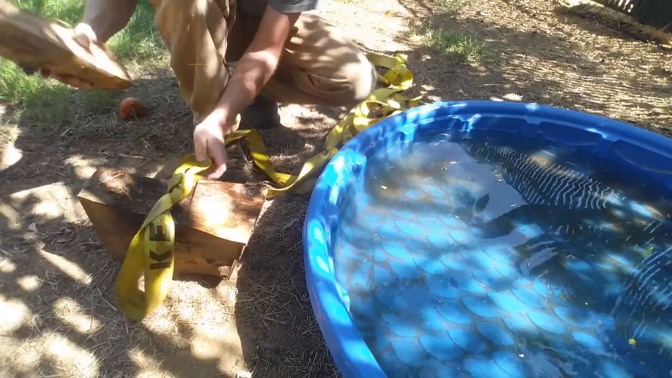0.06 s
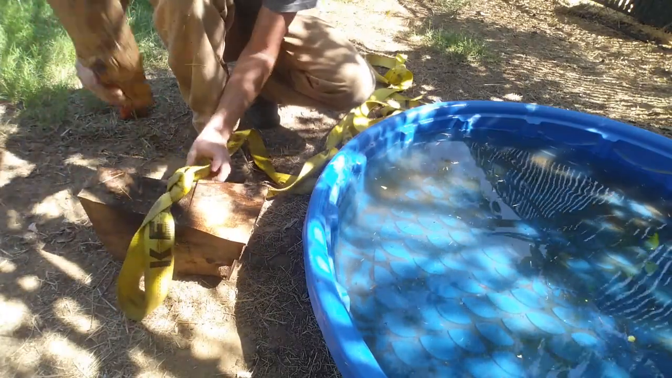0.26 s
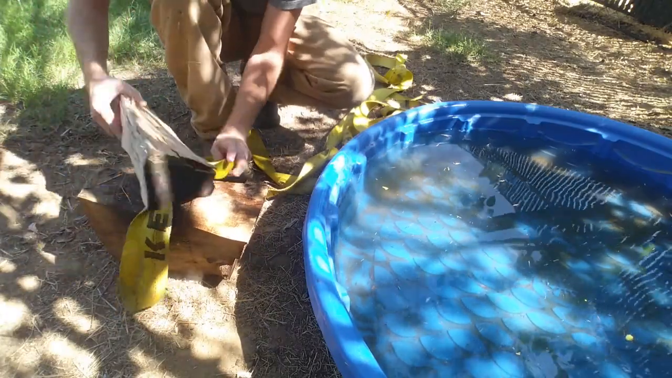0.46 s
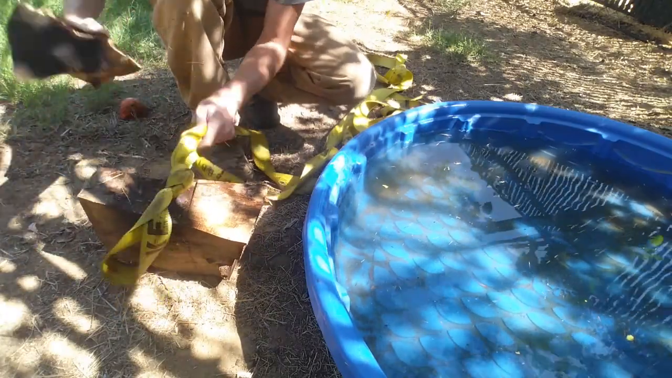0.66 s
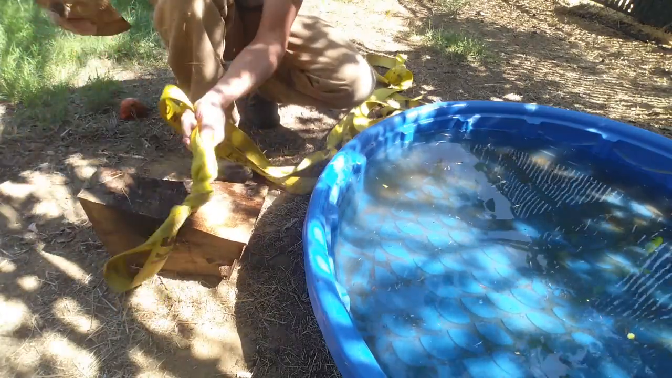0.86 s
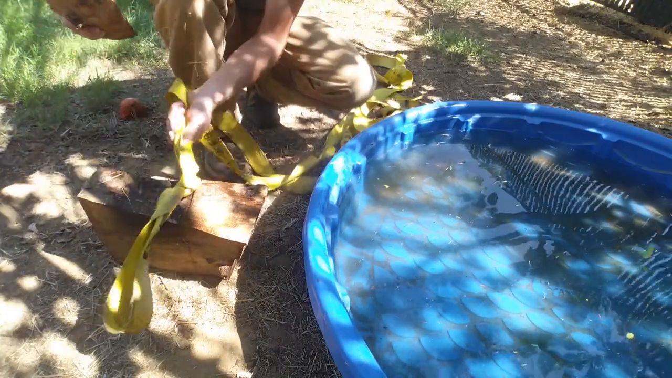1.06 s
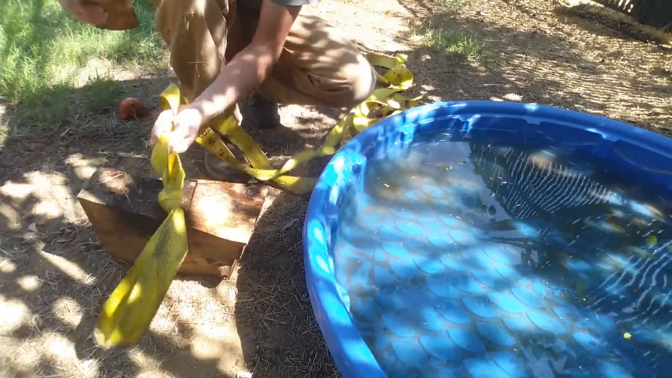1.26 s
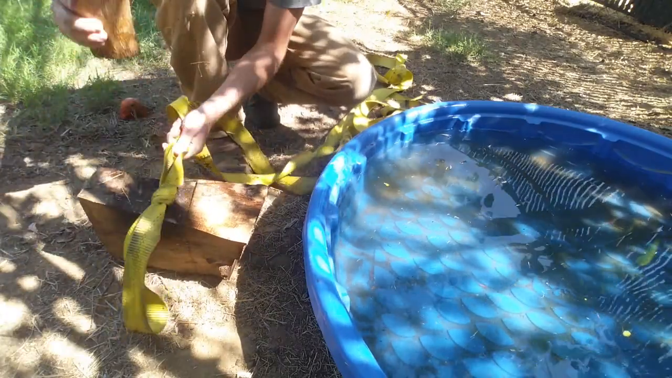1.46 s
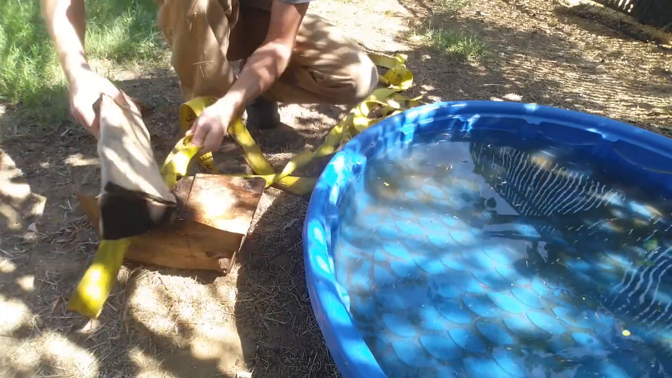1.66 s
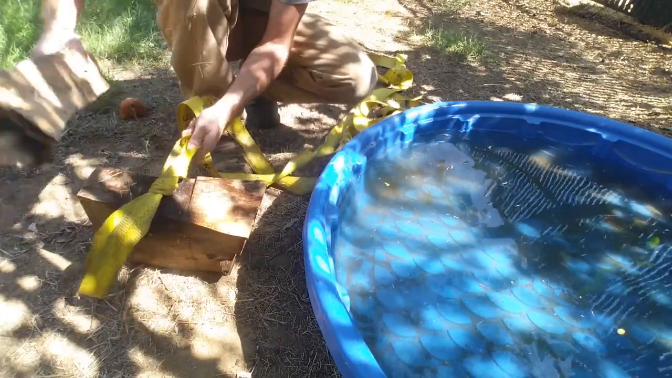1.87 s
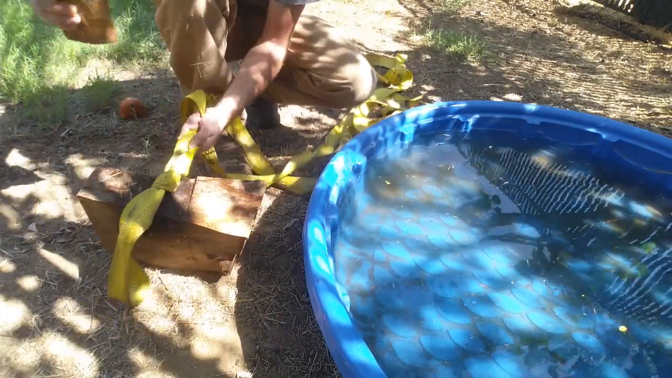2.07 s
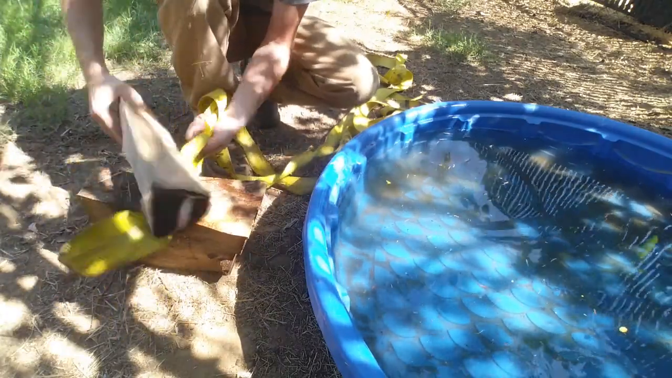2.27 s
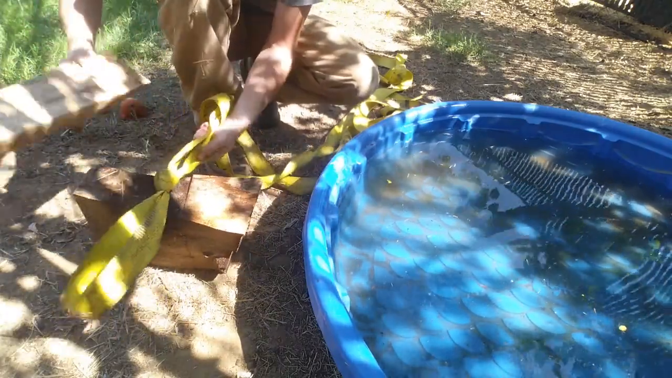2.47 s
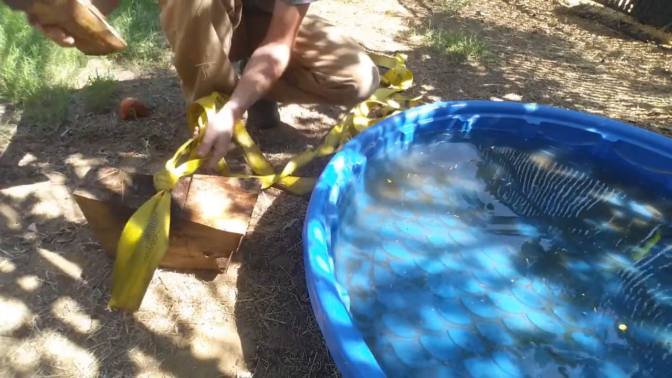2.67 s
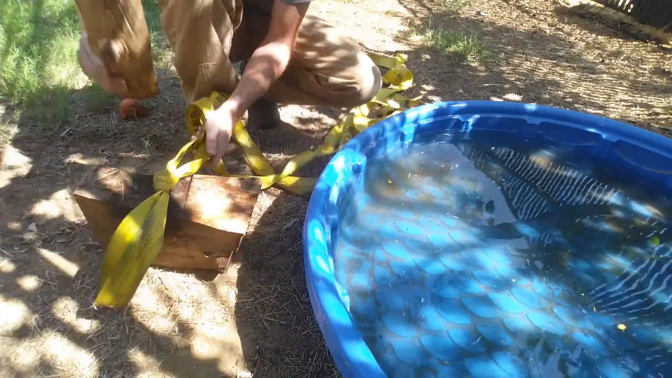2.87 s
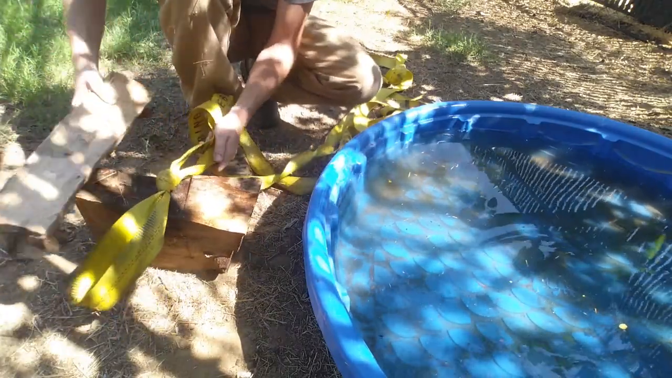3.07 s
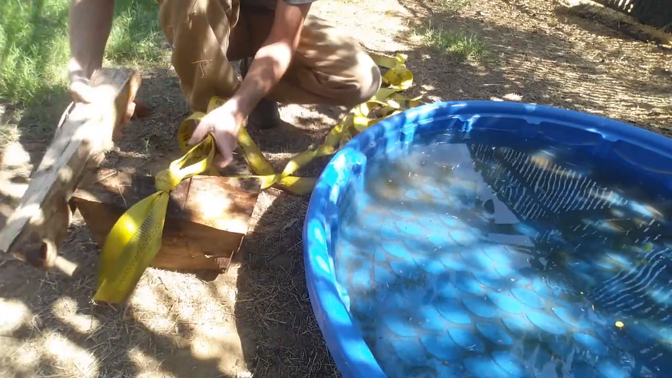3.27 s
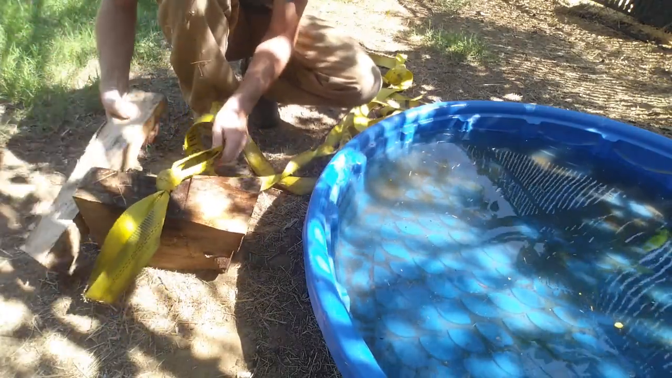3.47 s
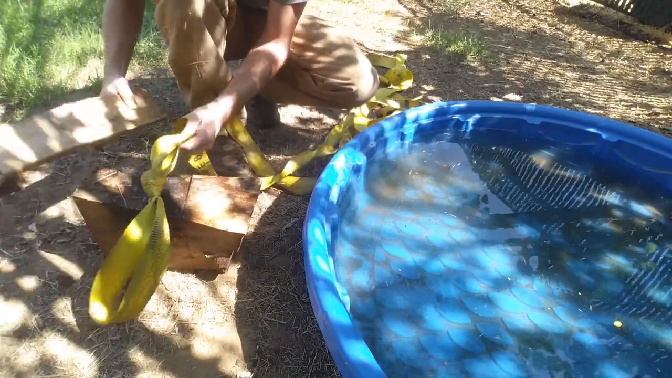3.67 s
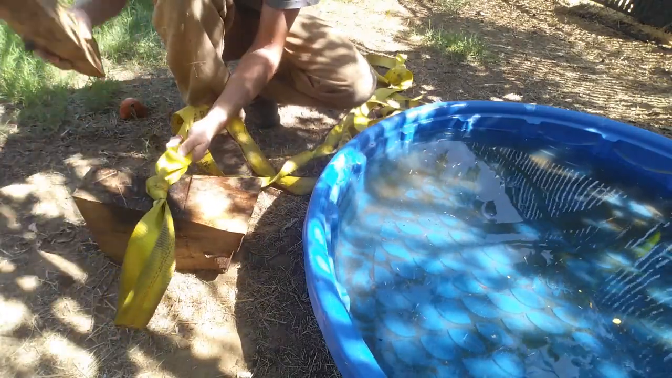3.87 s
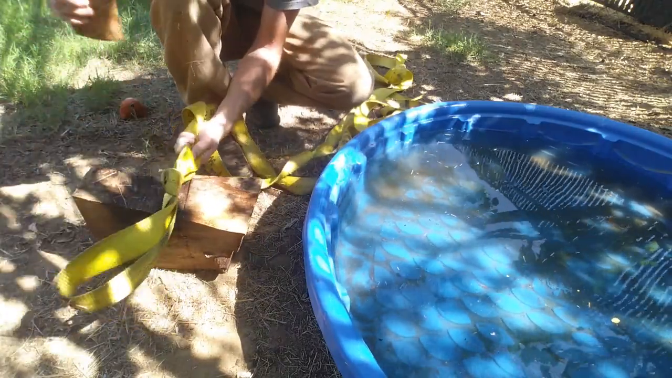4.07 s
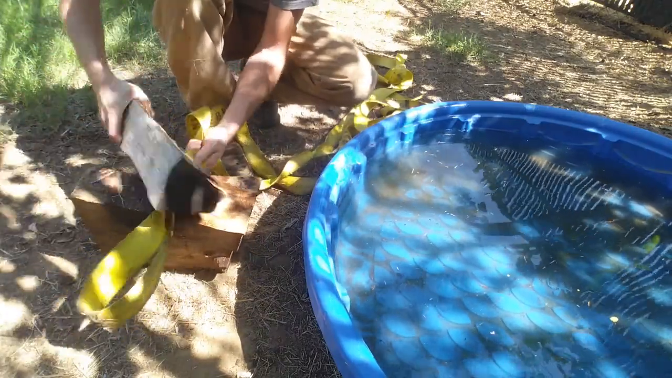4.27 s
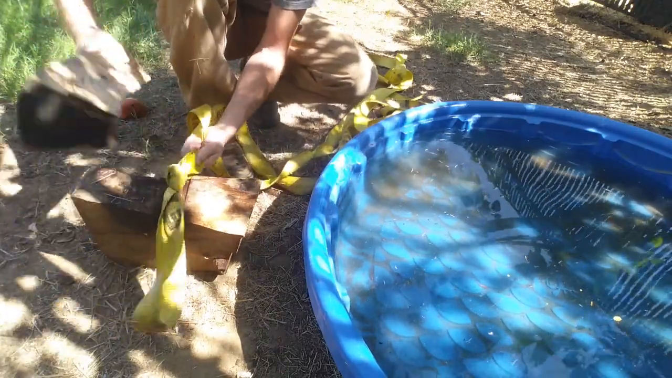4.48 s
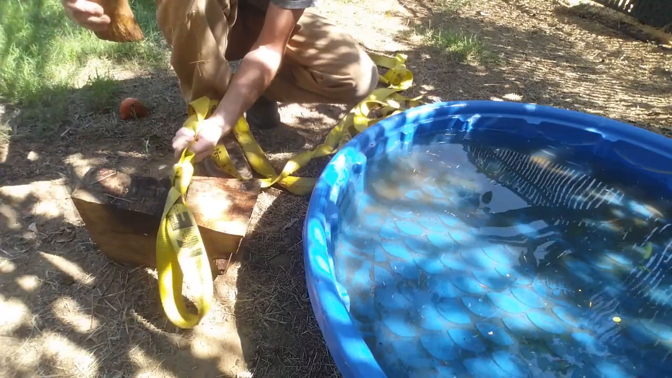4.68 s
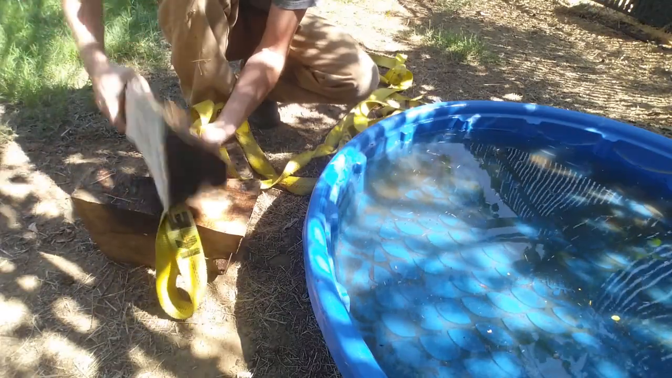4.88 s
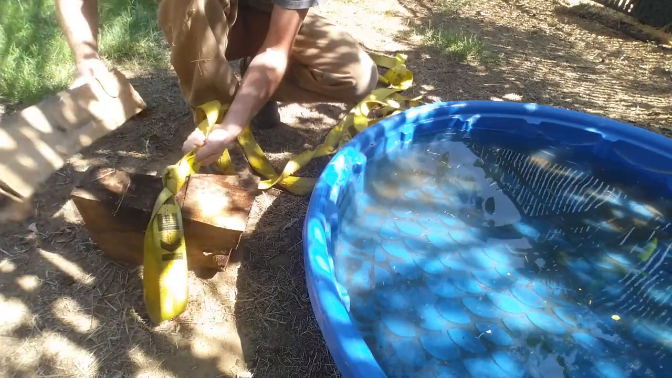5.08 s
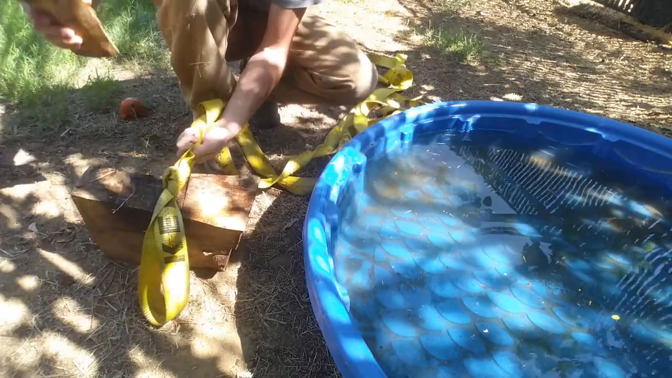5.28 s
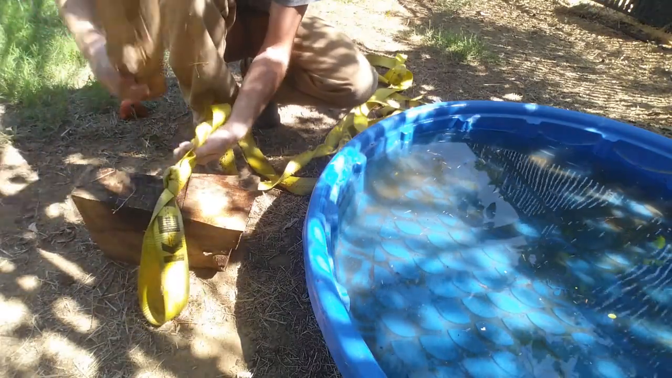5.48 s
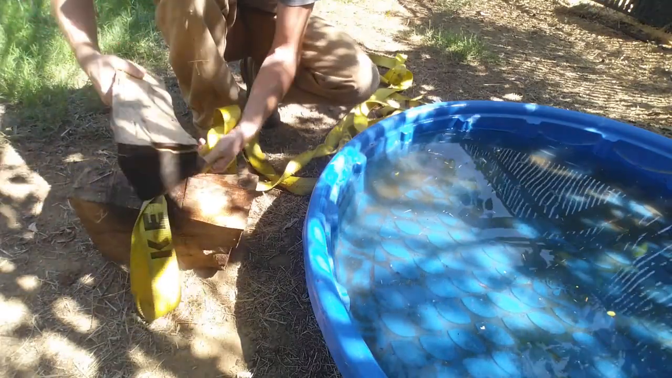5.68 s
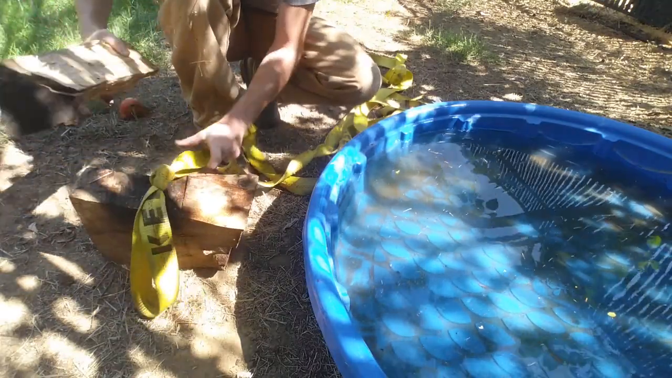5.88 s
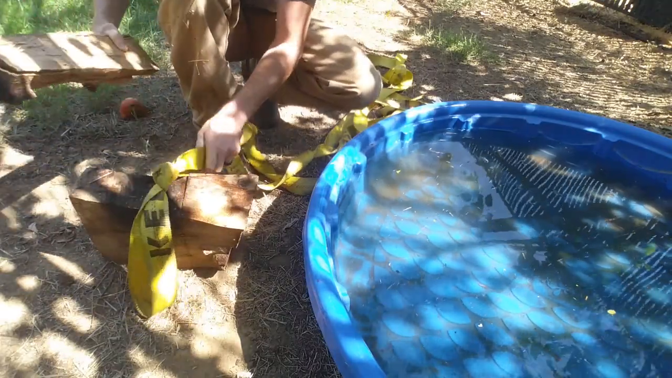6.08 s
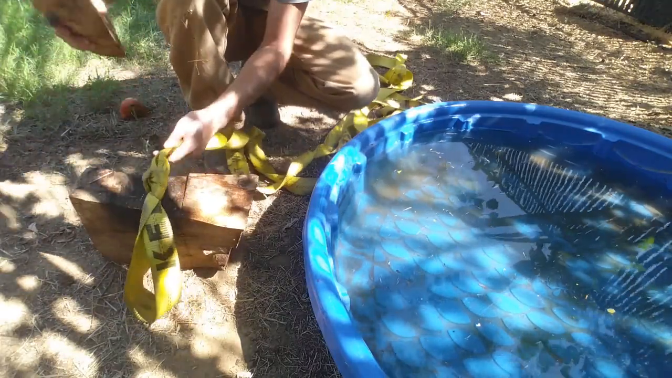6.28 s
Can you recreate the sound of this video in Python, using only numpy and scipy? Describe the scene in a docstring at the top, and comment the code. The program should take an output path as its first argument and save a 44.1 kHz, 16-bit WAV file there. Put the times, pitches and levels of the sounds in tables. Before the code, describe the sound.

An open yard with soft low traffic rumble, leaf noise, slight hiss and a wavering hum that partly fades. At 0.45 s a log hits a wet knotted strap on a wooden block: hard clack, short woody thud, small wet splat and a quick hollow ring, stronger on the right. Faint rustles and knot taps follow around 0.9-1.3 s. More blows land at 1.7, 2.4, 3.0, 4.4, 5.0 and 5.65 s; the one at 2.4 s is the splashiest, a bright spray, and 3.0 s has the hardest clack. Tiny soft touches precede most, with dull rebounds about 0.1 s after several. A wet slap at 3.1 s and ticks of the knot at 3.2-3.55 s follow. From about 3.5 s a vehicle swells, its engine pitch climbing from 4.1 to 5.55 s, then sagging and fading by 6 s. Echoes are short and sparse; the background ducks briefly after the sharpest hits.

```python
"""A yard: firewood pounds a wet knotted strap on a wooden block, seven blows with soft touches and rebounds.
Ringing modes clack and thud, shaped noise splats, and a delayed hollow ring answers, stronger on the right.
Noise bursts make the strap rustle and tick between blows; sparse echoes place them in the yard.
A low hum of wavering sines partly fades, a vehicle of swept engine orders and tyre noise speeds up and eases
off, and far traffic and leaves are patchy noise. A gain control ducks after the sharpest sounds."""
import sys
import numpy as np
from scipy import signal
from scipy.fft import rfft, irfft
from scipy.io import wavfile
from scipy.ndimage import uniform_filter1d

SR = 44100
rng = np.random.default_rng(int(sys.argv[2]) if len(sys.argv) > 2 else 0)


def master_out(mix):
    """Clip the mix to full scale and print it as 16-bit PCM to the path in sys.argv[1]."""
    frames = np.transpose(np.atleast_2d(mix))
    ceiling = np.clip(frames, -1, 1)
    pcm = np.round(ceiling * 32767).astype(np.int16)
    wavfile.write(sys.argv[1], SR, pcm)


def level_to_linear(level):
    """Convert decibel levels to linear amplitude factors, elementwise."""
    exponent = np.asarray(level, float) / 20
    return 10 ** exponent


N = 278712

# ringing modes of the wooden block: pitch_hz, level_db, t60_s
BLOCK_MODES = [(239, -0.5, 0.097), (304, 1, 0.02), (370.8, -3.5, 0.062), (468, -0.5, 0.035),
               (505, 0, 0.061), (640, -8, .03), (812, 0, .045), (940, -17, .03), (1100, -9, 0.041)]


def evened(x):
    """Scales to rms 1."""
    return x / np.sqrt(np.mean(x ** 2) + 1e-20)


def read(points, hz):
    """Reads a spectrum table on a log-frequency axis."""
    f, value = np.transpose(points)
    return np.interp(np.log(hz + 1), np.log(f + 1), value)


def add(mix, start_s, sound):
    """Mixes a sound in at start_s."""
    part = mix[..., round(start_s * SR):][..., :sound.shape[-1]]
    part += sound[..., :part.shape[-1]]


def ring(modes, detune=1):
    """Dying sines, one per mode; detune scales their pitches, as striking another spot would."""
    hz, db, t60 = np.transpose(modes)[..., None]
    t = np.arange(SR // 3) / SR
    waves = np.sin(2 * np.pi * (hz.T * detune).T * t)
    return (level_to_linear(db - 60 * t / t60) * waves).sum(0)


def contacts():
    """Every contact, slap included: start_s, clack_db, thud_db, splat_db, sharpness steps, squeeze_ms."""
    # full blows, wood driven onto wood: start_s, clack_db, thud_db, splat_db, squeeze_ms
    full_blows = [(0.457, -3.5, -10.5, -19.5, 3.84), (1.7262, -8, -10, -16.5, 4.3),
                  (2.3830, -5, -3, -2, 1.95), (3.0422, 2, -5, -14, 4.96), (4.368, -3, -4, -18.5, 6.2),
                  (4.9997, -10.5, -5.5, -16.5, 1.83), (5.6448, -3.5, -7, -15, 1.54)]
    # the log meets the soft knot just before most blows: start_s, clack_db, splat_db, squeeze_ms
    touches = [(.4519, -13.5, -37, 4.4), (1.7238, -21, -20.5, 3.1), (2.3752, -20.5, -24, 7.2),
               (4.3660, -12, -43, 4.7), (4.9935, -20, -29, 12.7), (5.6400, -14, -27, 6.1)]
    # the block lands again; at 3.12 s the wet strap slaps: start_s, thud_db, splat_db, squeeze_ms
    rebounds_and_slap = [(.544, -36, -53.5, 10.1), (1.826, -22.5, -44, 4.6), (3.1222, -38.5, -33, 9.3),
                         (4.5133, -34, -46.5, 5.1), (5.1067, -22.5, -43, 6.3), (5.7543, -30, -45, 4.2)]
    rows = []
    for s, clack, thud, splat, ms in full_blows:
        rows.append((s, clack, thud, splat, 0.76 * (splat + 12.5), ms))  # a louder splat is sharper
    for s, clack, splat, ms in touches:
        rows.append((s, clack, -39, splat, -4, ms))  # gentle contacts are dull
    for s, thud, splat, ms in rebounds_and_slap:
        rows.append((s, splat + 0.5, thud, splat, -5, ms))
    return rows


def blows():
    """Each contact rings log and block, squeezes water out and drives the block into the soil."""
    # the swung log: pitch_hz, level_db, t60_s
    log_modes = [(1092, -15, .06), (1304.5, -3.5, .06), (1446, 0, 0.084), (1656, -7.5, 0.017),
                 (2320, -19.5, 0.054), (2900, -10.5, 0.054), (3200, -22, 0.03)]
    # the block on the soil: pitch_hz, level_db relative to the contact's thud, t60_s
    thud_modes = [(205, 5, 0.016), (120, -18.5, 0.13), (71.4, -33, 0.12)]
    # the late ring: pitch_hz, level_db relative to the contact's thud, t60_s
    hollow_modes = [(140, -12, 0.12), (173, -11, 0.3), (193, -6, 0.24)]
    # colour of the water squeezed out: pitch_hz, relative level_db per Hz
    splat_colour = [(300, -23), (600, -5), (1000, -1), (1600, -6.5), (2200, -4), (3000, -3), (4200, -9),
                    (6000, -6), (9000, -15), (12000, -18), (16500, -14)]
    # how one step of sharpness recolours the splat: pitch_hz, change_db
    sharper = [(300, -1.5), (1500, 1.5), (3200, 1.03), (4250, 2.5), (4900, 1.98), (6100, 3), (7500, 2),
               (10500, 2.5), (16500, 2)]
    hollow_delay_s = 0.0172
    knock, thud, hollow = np.zeros((3, N))
    splat = np.zeros((2, N))
    t, hz = np.arange(16384) / SR, np.fft.rfftfreq(16384, 1 / SR)
    rows = contacts()
    noises = rng.standard_normal((len(rows), 4, 16384))
    for (s, clack_db, thud_db, splat_db, sharp, ms), (grit, *water) in zip(rows, noises):
        squeeze = ms / 1000
        after = np.maximum(t - squeeze, 0)

        # the log rings while the knot crushes under it; wood on wood then chokes the ring
        force = grit * (t < squeeze) * 0.5 / np.sqrt(squeeze * SR)
        force[2] += 1
        clack = signal.fftconvolve(uniform_filter1d(force[:1000], size=5), ring(log_modes))[:8192]
        clack *= np.minimum(t[:8192] / (0.34 * squeeze), 1)
        clack *= level_to_linear(-60 * after[:8192] / 0.013)
        add(knock, s, level_to_linear(clack_db) * clack / abs(clack).max())

        # the block is driven down late in the squeeze and grinds on the soil as it settles
        deepest = s + 0.55 * squeeze
        grind = grit[::-1][:3000] * level_to_linear(-60 * t[:3000] / 0.083)
        detune = 1 + 0.043 * grit[-len(BLOCK_MODES):]
        body = signal.fftconvolve(grind, ring(BLOCK_MODES, detune))
        body /= abs(body).max()
        add(knock, deepest, level_to_linear(thud_db - 4.5) * body)
        add(hollow, deepest + hollow_delay_s, level_to_linear(thud_db - 11) * body)
        add(thud, deepest, level_to_linear(thud_db) * ring(thud_modes))
        add(hollow, deepest + hollow_delay_s, level_to_linear(thud_db) * ring(hollow_modes))

        # water cracks out during the squeeze, then sprays on in ragged drops, wider left and right
        colour = level_to_linear(read(splat_colour, hz) + sharp * read(sharper, hz))
        both, left, right = evened(irfft(rfft(water) * colour))
        drops = level_to_linear(2.5 * evened(uniform_filter1d(grit, 150)))
        rise = level_to_linear(splat_db) * np.minimum(t / (0.22 * squeeze), 1)
        spray = np.array([left, right]) * drops * level_to_linear(-4.5 - 60 * after / 0.09)
        add(knock, s, rise * both * level_to_linear(-60 * after / 0.0063))
        add(splat, s, rise * spray)

        # a gust of air, audible only under a violent splat
        add(thud, s, ring([(58, 6 + 3 * splat_db, 0.06)]))

        # a duller patter lingers
        patter = uniform_filter1d([right, left], size=5, axis=1)
        add(splat, s, rise * patter * level_to_linear(-24.5 - 60 * after / 0.45))
    soft = signal.windows.hann(60)  # rounds off the low onsets
    thud, hollow = signal.oaconvolve([thud, hollow], soft[None] / soft.sum(), axes=1)[:, :N]
    return knock, splat, thud, hollow


def strap():
    """Short grainy noise bursts in one resonance each, slightly different left and right; taps ring the block."""
    # the strap rubs and flaps: start_s, level_db, centre_hz, length_ms to fall 14 dB
    rustles = [(0.139, -63.5, 3500, 17), (.93, -65.5, 3260, 13), (1.053, -52, 2340, 66),
               (1.10, -66.5, 6530, 100), (1.25, -57, 7500, 25), (1.34, -70, 6000, 61),
               (1.804, -46, 2900, 18.7), (1.865, -59, 3920, 34), (2.14, -69, 6450, 110),
               (3.295, -65.5, 6190, 46), (4.14, -52, 6490, 17), (4.688, -59.5, 8700, 9.9)]
    # the knot drops or ticks on the block: start_s, ring_db, ring pitch factor for the spot, tick_db, tick_hz
    knot_taps = [(1.013, -40, 0.89, -67, 900), (1.188, -48, 2.1, -56, 4270), (3.232, -65, 1.84, -56, 6100),
                 (3.315, -45, 2.2, -44.5, 2070), (3.393, -32, 1.11, -38, 3980),
                 (3.503, -41, 1.5, -36.5, 4800), (3.55, -53, 1.33, -70, 905)]
    out = np.zeros((2, N))
    t, hz = np.arange(8192) / SR, np.fft.rfftfreq(8192, 1 / SR)
    # the last entry is the resonance width as a share of its centre
    bursts = [(*row, 0.7) for row in rustles]
    bursts += [(s, db, f, 7, 0.45) for s, *_, db, f in knot_taps]
    noises = rng.standard_normal((len(bursts), 3, 8192))
    for (s, db, centre_hz, ms, share), noise in zip(bursts, noises):
        grains = level_to_linear(2.5 * evened(uniform_filter1d(noise[2], 60)))
        stereo = rfft(noise[:2] + 0.63 * noise[1::-1])
        resonance = 1 / (1 + (2 * (hz / centre_hz - 1) / share) ** 2)
        band = evened(irfft(stereo * resonance))
        envelope = level_to_linear(db - 14 * t / (ms / 1000)) * np.minimum(t / 0.0008, 1)
        add(out, s, envelope * grains * band)
    for s, block_db, spot, *_ in knot_taps:
        light = np.diff(ring(BLOCK_MODES, spot)[:8193])  # a light knot favours the upper modes
        light *= level_to_linear(-60 * t / 0.08) * np.minimum(t / 0.002, 1)
        add(out, s, level_to_linear(block_db) * light / abs(light).max())
    return out


def yard(x):
    """Sparse random-sign echoes; the blend of three stereo patterns turns slowly, so the echo keeps changing."""
    # how long the yard rings: pitch_hz, t60_s
    echo_decay = [(250, 0.41), (1000, 0.09), (3000, 0.15), (6000, 0.32), (12000, 0.25)]
    taps = np.zeros((6, SR // 2))
    jitter = rng.integers(0, 20, (6, (SR // 2 - 201) // 20))
    at = np.arange(200, SR // 2 - 20, 20) + jitter
    np.put_along_axis(taps, at, rng.choice([-1., 1.], at.shape), 1)
    hz, t, z = signal.stft(taps, SR, nperseg=256)
    z = z * level_to_linear(-60 * t / read(echo_decay, hz)[:, None])
    tails = signal.istft(z, SR, nperseg=256)[1]
    turn = np.arange(N) * np.pi / SR / 2 + np.arange(3)[:, None] * np.pi / 3
    shares = np.repeat(np.sqrt(2 / 3) * np.cos(turn) * x, 2, axis=0)
    wet = signal.fftconvolve(shares, tails / np.linalg.norm(tails[0]), axes=1)[:, :N]
    return wet.reshape(3, 2, N).sum(0)


def wander(rate_hz):
    """Slow random drift of rms 1: smoothed noise through a one-pole lowpass."""
    noise = uniform_filter1d(rng.standard_normal(N), 999)
    return evened(signal.lfilter([1], [1, -np.exp(-2 * np.pi * rate_hz / SR)], noise))


def wash(spectrum, patchy_db):
    """Two-channel noise of rms 1 from random short-time spectra with drifting patches."""
    # how alike left and right are: pitch_hz, likeness (-1 to 1)
    likeness = [(60, 1), (130, .97), (290, 0.86), (640, 0.49), (1300, -0.64), (2400, 0), (16000, -0.2)]
    # stereo tilt: pitch_hz, left minus right level_db
    balance = [(60, 3), (180, -1.5), (550, -0.5), (1650, 0), (4970, -4.5), (15000, 3)]
    frames, hz = N // 512 + 5, np.fft.rfftfreq(2048, 1 / SR)
    a, b, c, d, patches = rng.standard_normal((frames, 1025, 5)).T
    patches = evened(uniform_filter1d(uniform_filter1d(patches, 20, axis=0), 8, axis=1))
    same = np.clip(read(likeness, hz), -1, 1)[:, None]
    left = a + 1j * b
    right = same * left + np.sqrt(1 - same ** 2) * (c + 1j * d)
    z = np.array([left * level_to_linear(read(balance, hz))[:, None], right])
    z *= level_to_linear(read(spectrum, hz)[:, None] + patchy_db * patches)
    return evened(signal.istft(z, nperseg=2048, noverlap=1536)[1][:, :N])


def vehicle():
    """Engine orders sweep through the exhaust pipe's colour; tyre roar follows the level less steeply."""
    # loudness of the pass: time_s, level_db
    pass_level = [(3.3, -59), (4.1, -39.5), (4.75, -44), (5.2, -38.5), (5.55, -36.5), (6, -52.5),
                  (6.35, -52.5)]
    # colour of the exhaust pipe: pitch_hz, level_db
    exhaust = [(40, -5), (70, -4.5), (105, -3), (150, -2), (185, -14), (300, -11), (450, -25.5)]
    # engine orders: multiple of the cycle rate, level_db
    orders = [(3, -14), (4, 2), (5, -3), (6, 0), (7, -15), (8, 3), (9, -6), (10, -15), (11, -9), (12, -13),
              (13, -9), (14, -7), (15, -7)]
    # colour of the tyres: pitch_hz, relative level_db per Hz
    roar_colour = [(60, -11), (200, -8), (400, -23.5), (900, -20.5), (1800, -20), (3200, -24), (4500, -38),
                   (6500, -40.5), (8000, -53)]
    pull_s, lift_s = 4.1, 5.56  # the hard pull starts; the driver lifts
    t = np.arange(N) / SR
    level_db = np.interp(t, *np.transpose(pass_level))
    cycles_hz = 25.3 - 8.3 * np.clip(lift_s - t, 0, lift_s - pull_s)  # climbs 8.3 Hz per s to 25.3 Hz
    cycles_hz -= 9.5 * np.maximum(t - lift_s, 0)  # sags after the lift
    cycles_hz -= 4.5 * np.clip(pull_s - t, 0, 1)  # gentler climb in the second before the pull
    turns = np.cumsum(cycles_hz) / SR
    engine = np.zeros(N)
    for k, db in orders:
        order_db = db + read(exhaust, k * cycles_hz) + 1.5 * wander(3.9)
        engine += level_to_linear(order_db) * np.sin(2 * np.pi * (k * turns + rng.random()))
    return level_to_linear(level_db) * engine + level_to_linear(0.67 * level_db - 23.5) * wash(roar_colour, 0.9)


def hum():
    """Low hum: sines that waver in pitch and level, some of which soon fade away."""
    # hum tones: pitch_hz, rms level_db at the start, change in dB per s, width_hz (wavers by a quarter)
    tones = [(55, -52.5, -0.1, 3), (78.4, -48.5, -2, 1.2), (111.3, -57, 0, 2.9), (134.3, -54.5, -9, 5.7),
             (236.4, -61, 0.5, 9.3), (379, -60.5, -7, 5.7), (610, -68, -15.5, 8)]
    t = np.arange(N) / SR
    out = np.zeros(N)
    for hz, db, slope_db, width_hz in tones:
        gain = np.sqrt(2) * level_to_linear(db + slope_db * t + 0.76 * wander(3.0))
        pitch_hz = hz + 0.25 * width_hz * wander(1.9)
        out += gain * np.sin(2 * np.pi * np.cumsum(pitch_hz) / SR)
    return out


def air():
    """Far traffic and leaves: coloured noise whose level drifts."""
    # colour of the background: pitch_hz, relative level_db per Hz
    air_colour = [(25, -4.5), (60, -1), (118, -5.5), (197, -13.5), (260, -17.5), (400, -22), (634, -27),
                  (1280, -26.5), (2750, -34.5), (4130, -43), (6500, -46.5), (9000, -48), (16500, -54.5)]
    # its loudness: time_s, level_db
    air_level = [(0, -44), (.6, -47.5), (1.5, -43), (2.4, -41.5), (3.201, -43.5), (4.5, -40.5),
                 (6.4, -43.5)]
    level_db = np.interp(np.arange(N) / SR, *np.transpose(air_level))
    return level_to_linear(level_db) * wash(air_colour, 0.5)


def scene():
    """The woods stand a little nearer the right: the left hears them later and softer."""
    knock, splat, thud, hollow = blows()
    near, rustle = knock + thud, strap()
    lag = np.exp(-2j * np.pi * np.fft.rfftfreq(N, 1 / SR) * 1e-4)  # 0.1 ms
    left = level_to_linear(-1.5) * irfft(rfft(near) * lag, N) - 0.26 * hollow  # hollow ring in opposed sign
    direct = np.array([left, near + hollow])
    echoes = level_to_linear(-13.5) * yard(knock + 0.4 * thud + 0.8 * rustle[0])
    hiss = level_to_linear(-72.5) * rng.standard_normal((2, N))  # microphone noise
    return direct + splat + rustle + echoes + vehicle() + hum() + air() + hiss


def roll_off(x):
    """The treble ends steeply here."""
    return signal.sosfilt(signal.butter(12, 17270, fs=SR, output="sos"), x)


def record(dry):
    """Microphone colour; a treble-led gain control ducks up to 12 dB and recovers slowly; peaks clip."""
    # microphone response: pitch_hz, level_db
    mic_colour = [(20, -32.5), (45, -15), (80, -1.5), (120, 1), (3600, 1), (4200, 4), (4900, 1),
                  (5600, 2.5), (6200, 5.5), (6900, 2), (7800, -5.5), (11000, -2.5), (15500, -2.5),
                  (17000, -7)]
    log_gain = np.log(level_to_linear(read(mic_colour, abs(np.fft.fftfreq(8192, 1 / SR)))))
    colour = np.fft.ifft(np.exp(np.conj(signal.hilbert(log_gain)))).real[:4096]  # causal
    heard = signal.oaconvolve(dry, colour[None], axes=1)[:, :N]

    # sample differences weigh the treble
    sharp_power = uniform_filter1d((np.diff(heard, prepend=0) ** 2).mean(0), 200)
    sharp_db = 10 * np.log10(abs(sharp_power) + 1e-12)
    regained_db = np.arange(N) * 10.3 / SR  # 10.3 dB per second
    over_db = np.maximum.accumulate(2 * (sharp_db + 15) + regained_db) - regained_db
    duck_db = signal.lfilter([0.008], [1, -1 + 0.008], np.clip(over_db, 0, 12))
    clipped = np.clip(heard / level_to_linear(duck_db), -0.86, 0.86)

    lowpass = signal.firwin(255, 16200, window=("kaiser", 9), fs=SR)
    mix = signal.oaconvolve(clipped, lowpass[None], "same", axes=1)
    return roll_off(mix)


dry = scene()
out = record(dry)
master_out(out)
```